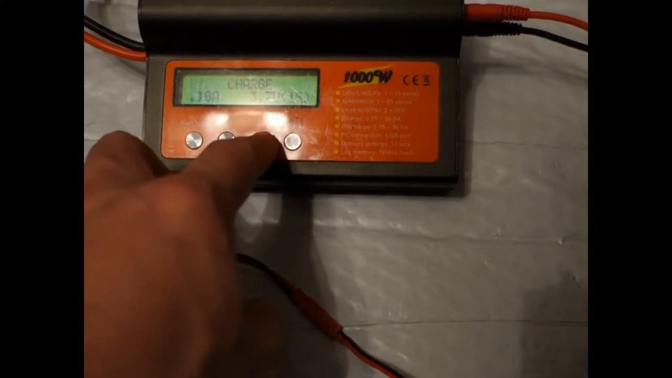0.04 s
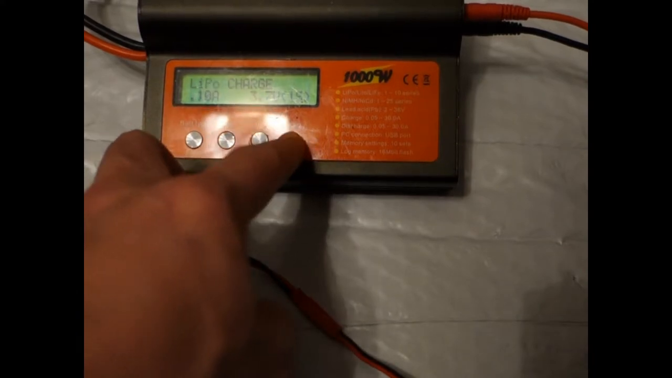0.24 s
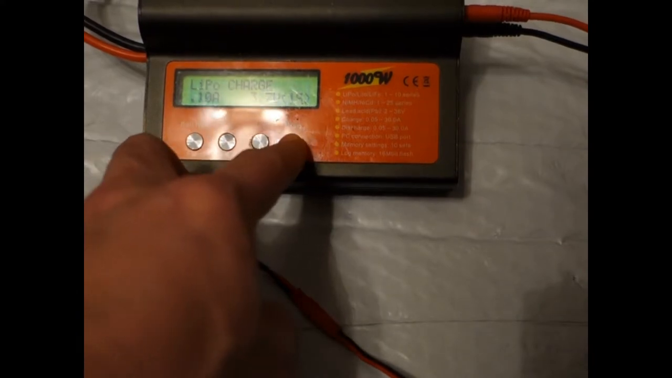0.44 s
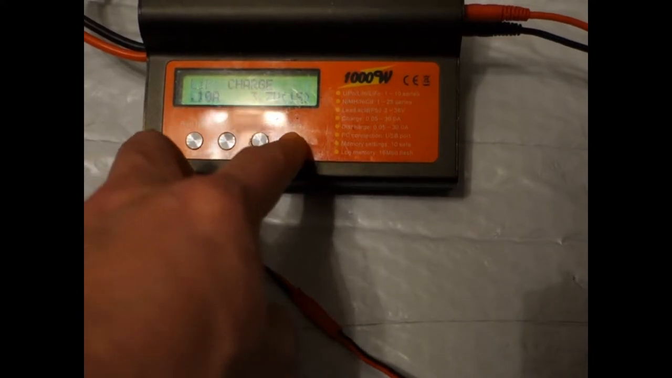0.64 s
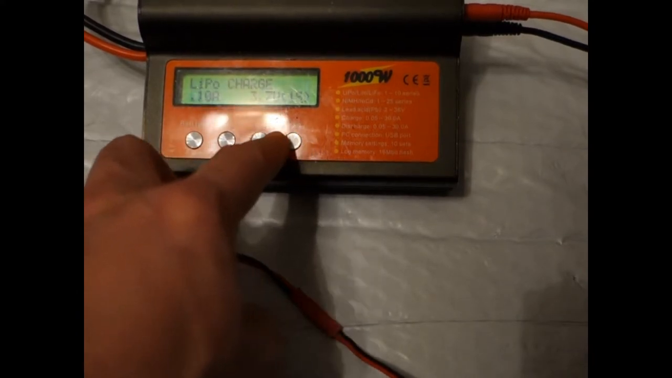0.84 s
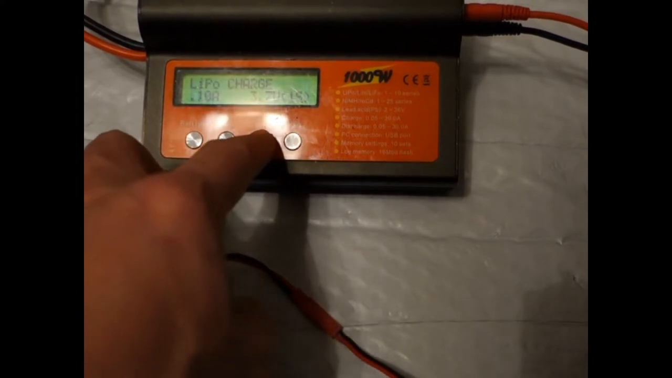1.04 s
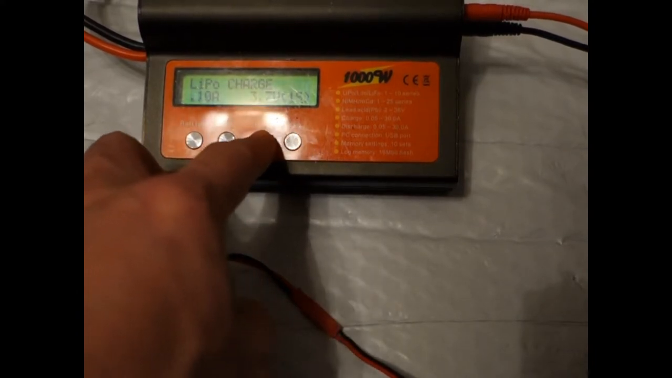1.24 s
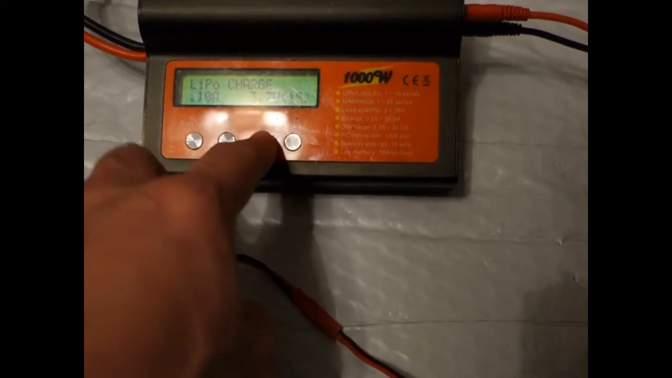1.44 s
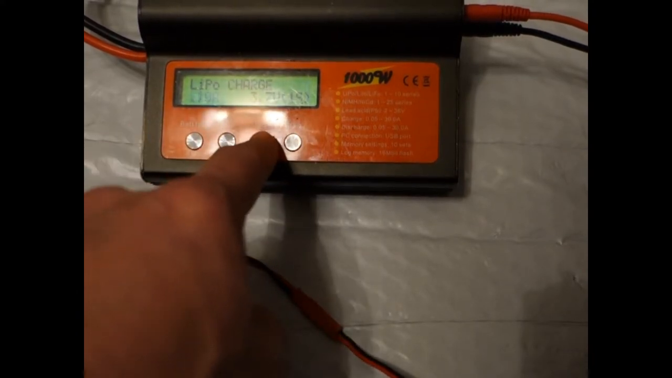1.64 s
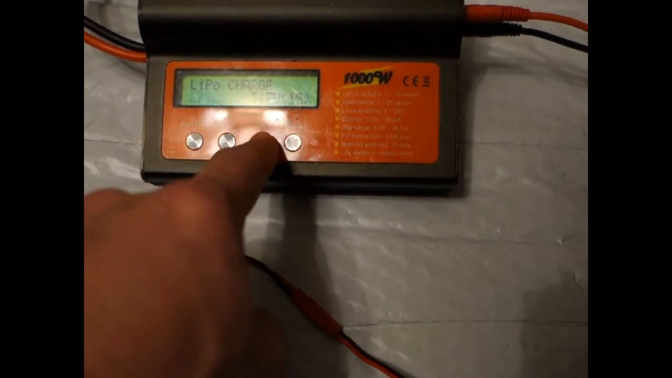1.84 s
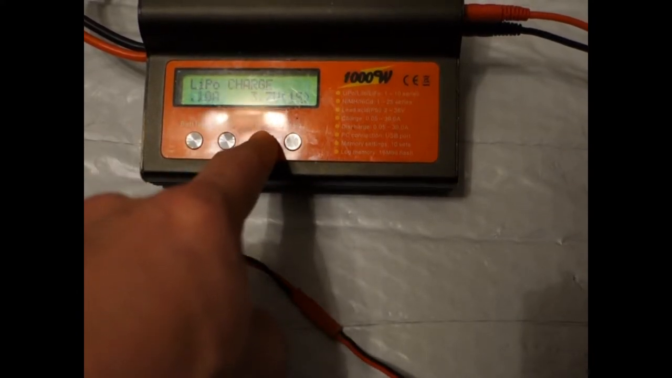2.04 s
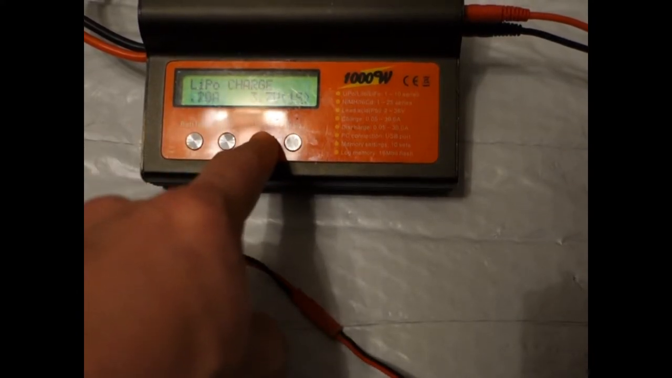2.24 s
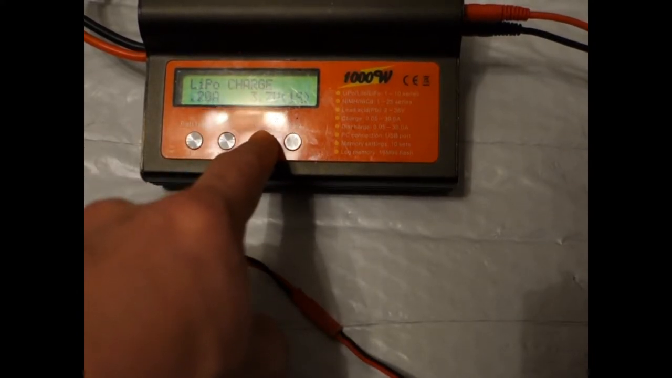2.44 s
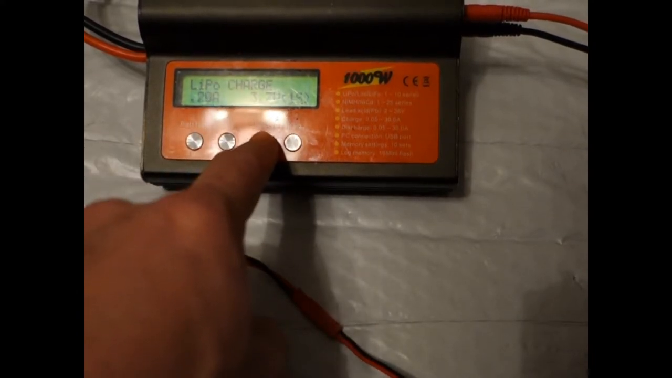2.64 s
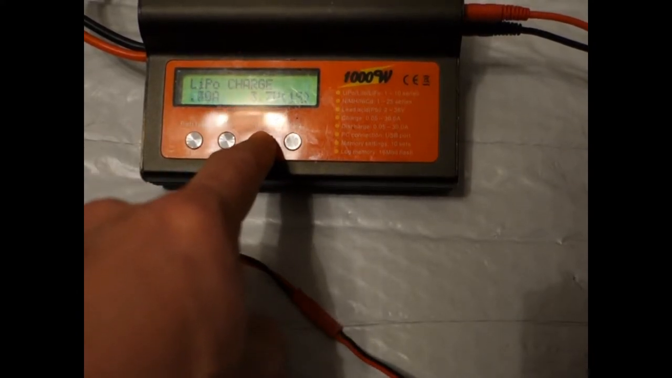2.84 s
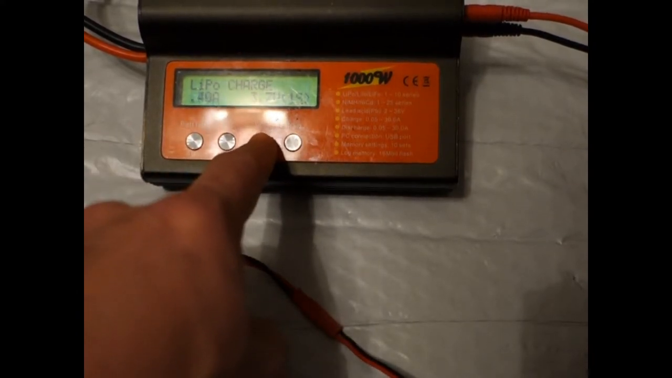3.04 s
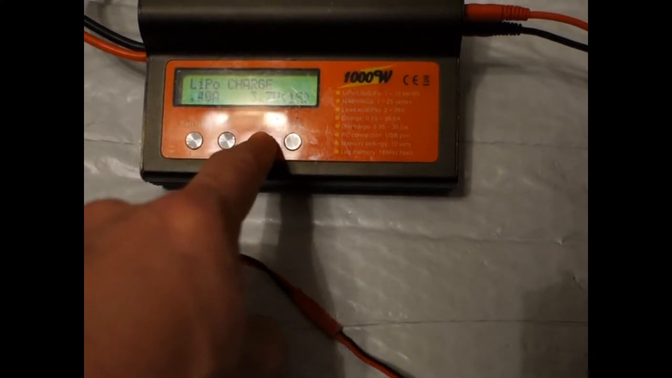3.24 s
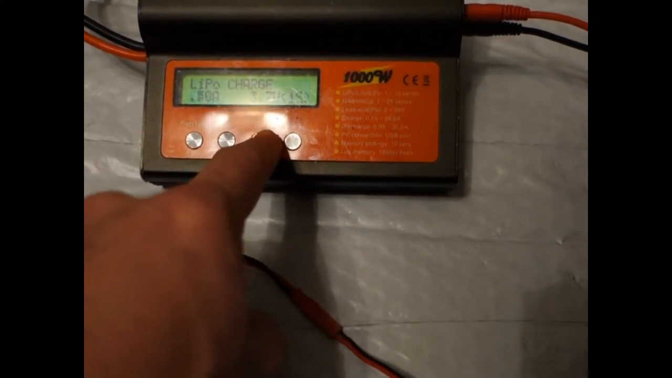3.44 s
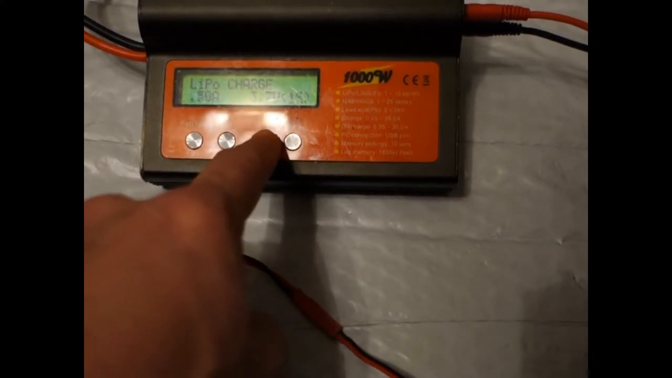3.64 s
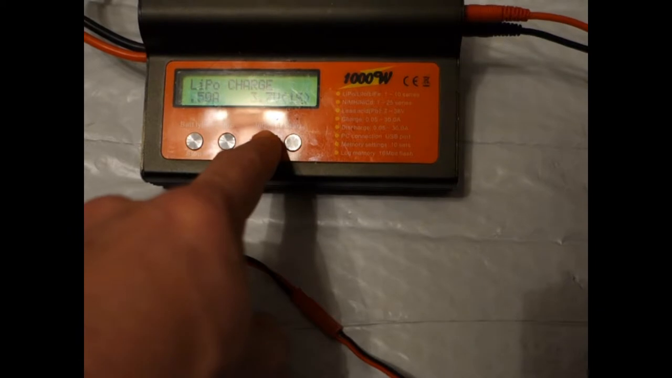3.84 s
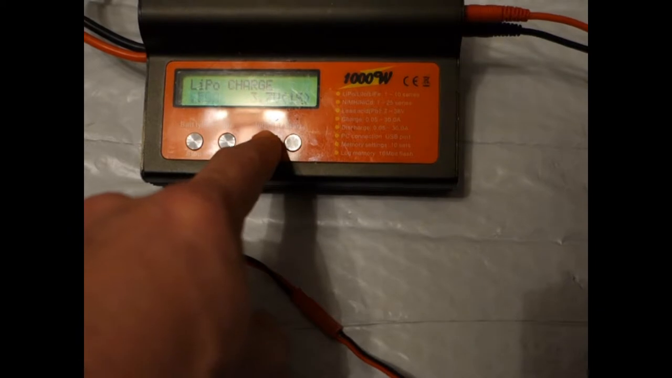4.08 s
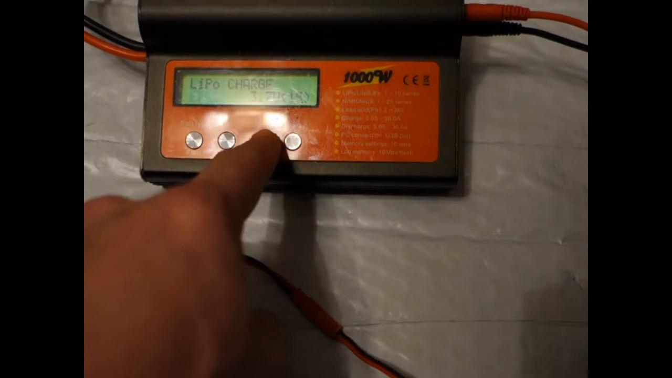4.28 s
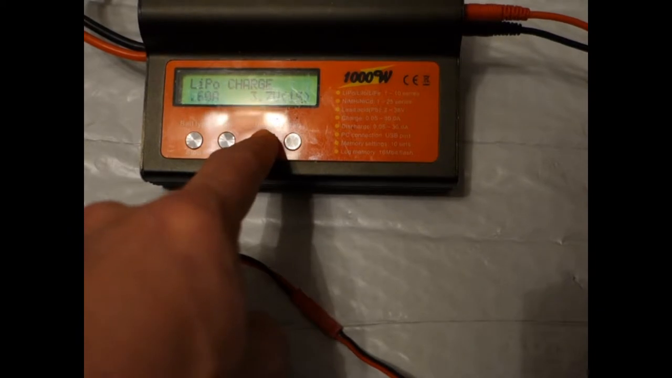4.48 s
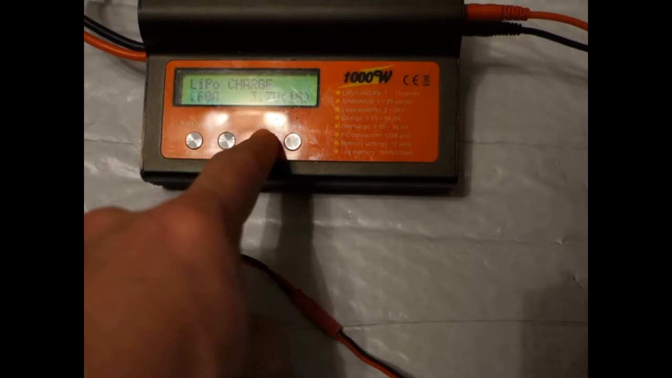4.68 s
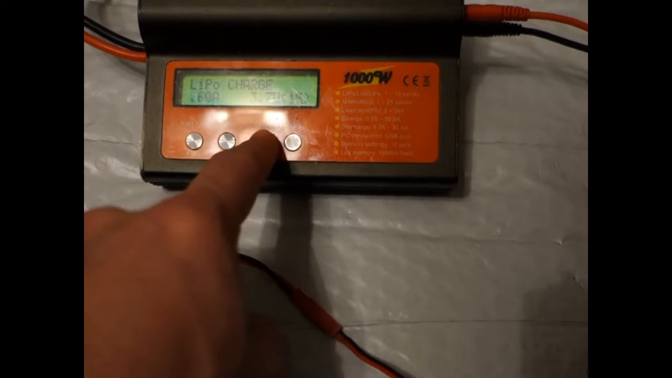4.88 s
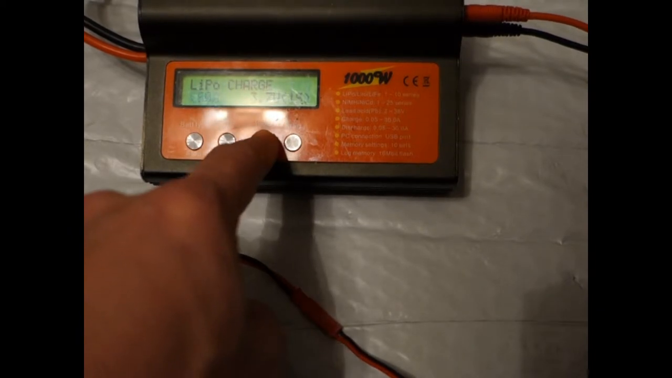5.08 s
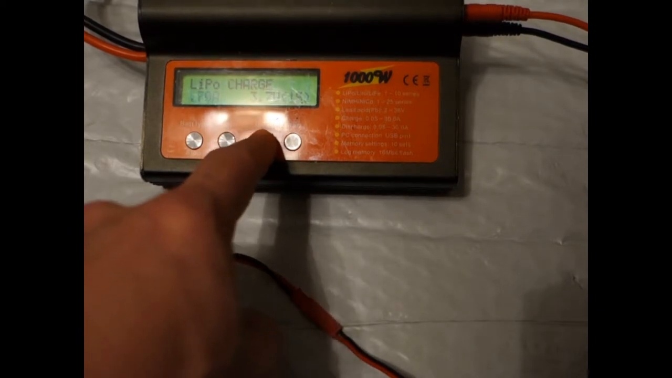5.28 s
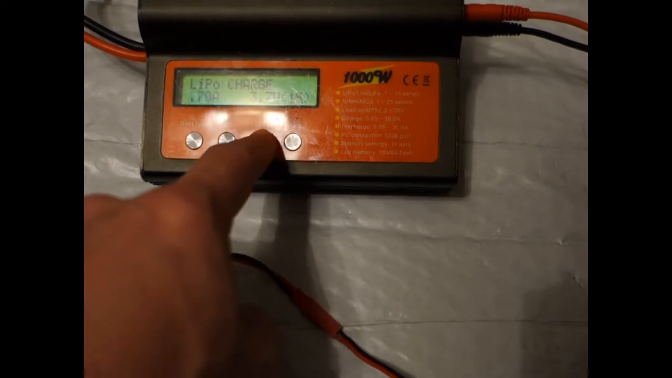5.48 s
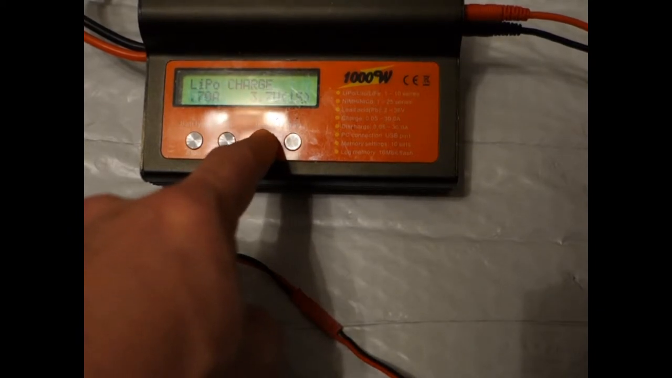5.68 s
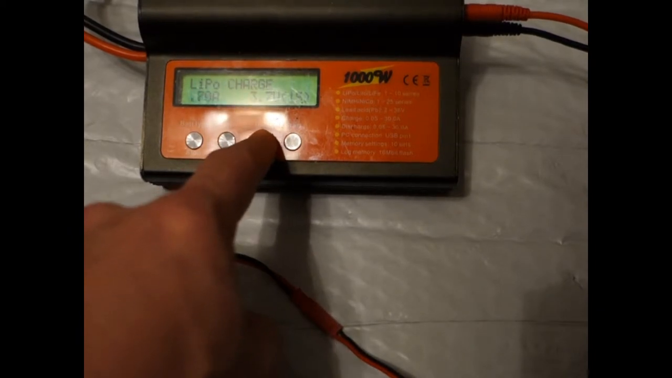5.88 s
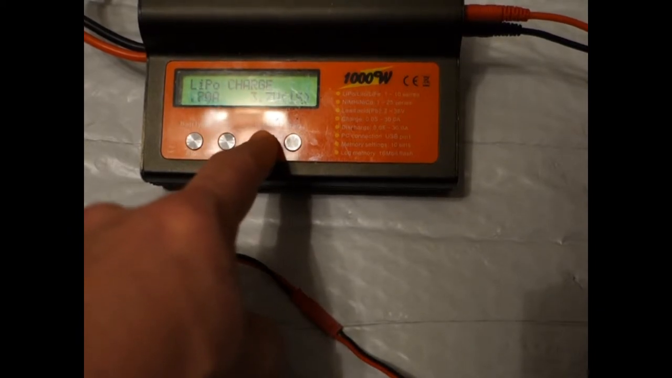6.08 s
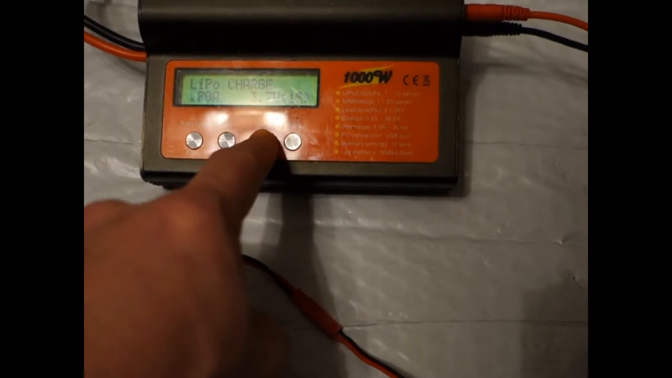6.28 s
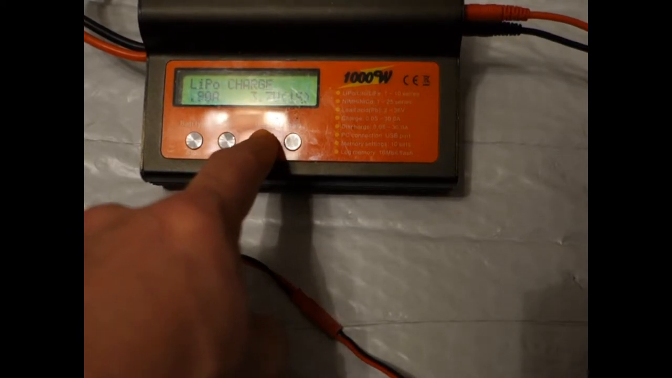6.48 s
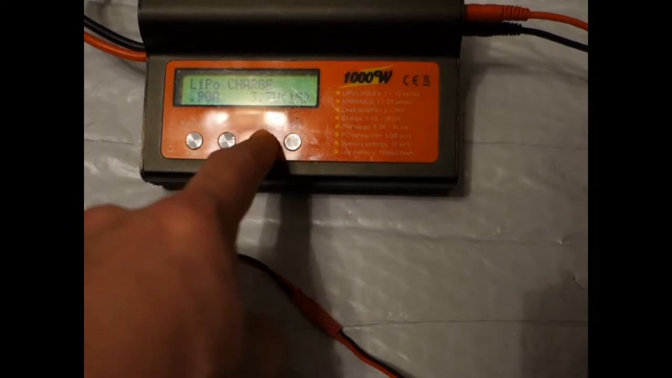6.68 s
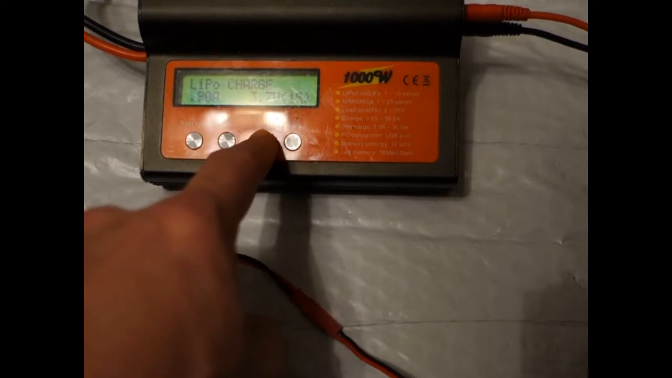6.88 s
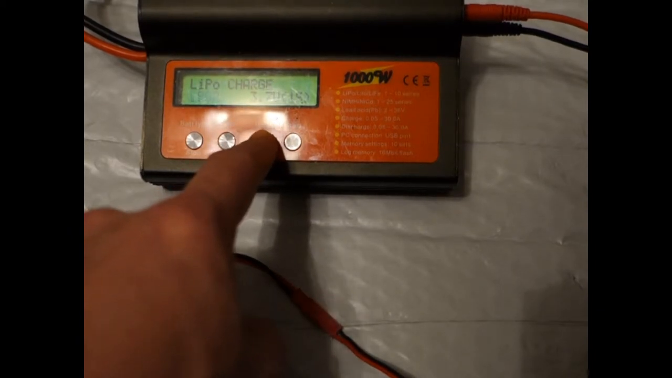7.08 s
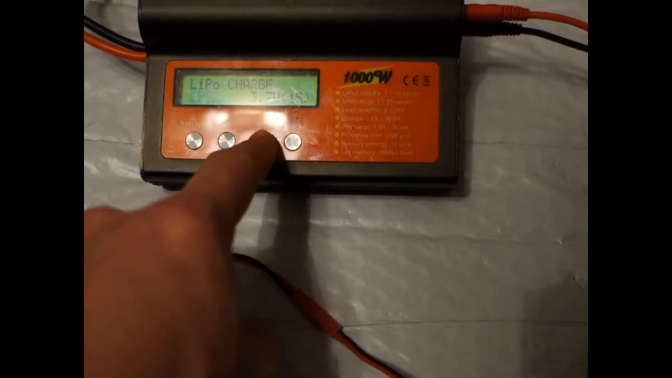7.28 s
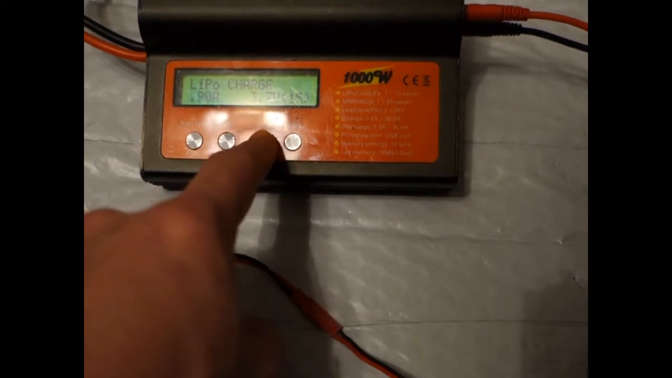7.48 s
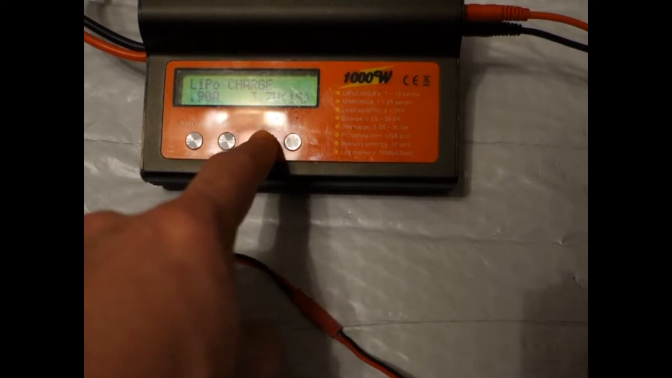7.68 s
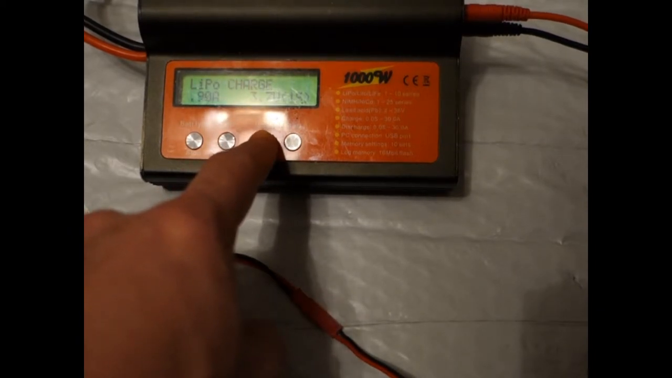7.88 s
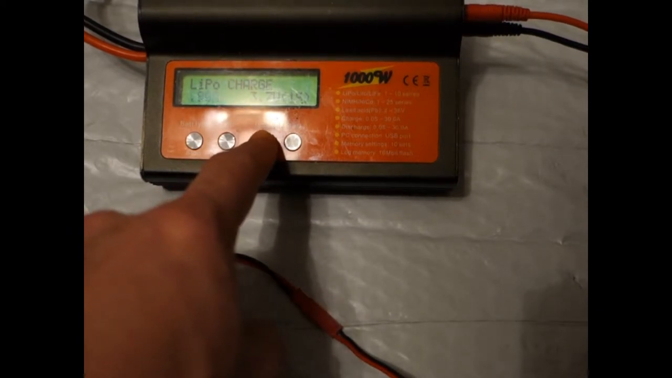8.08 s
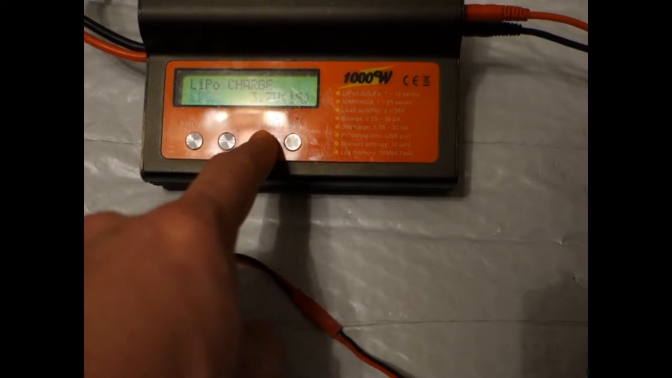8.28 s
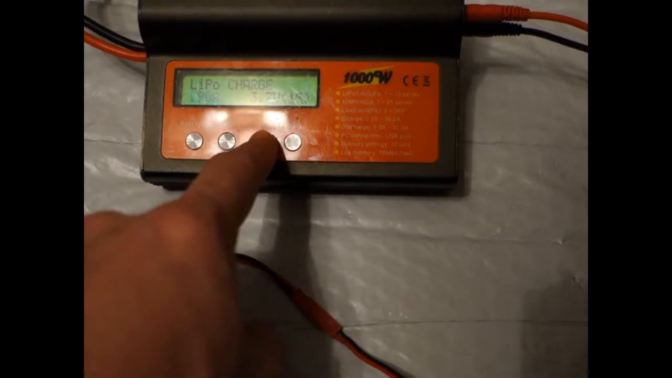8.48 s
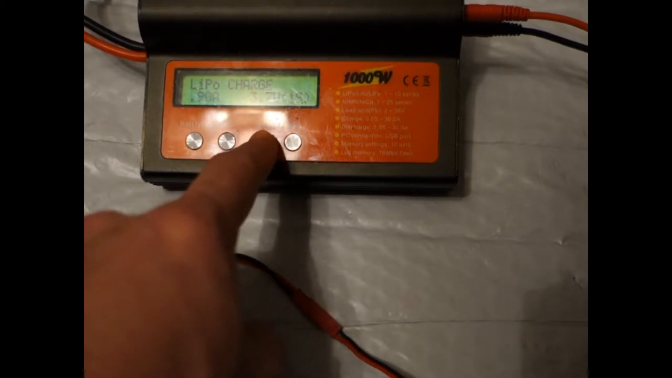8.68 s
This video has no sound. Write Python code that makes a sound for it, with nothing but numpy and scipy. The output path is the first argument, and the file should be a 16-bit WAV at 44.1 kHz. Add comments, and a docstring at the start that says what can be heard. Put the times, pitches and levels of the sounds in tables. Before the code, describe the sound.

A finger clicks dome buttons on a small device, each press a dull knock and each release crisper, while a small fan hums and chatters.

```python
"""On a table top in a room, a finger presses and lets go the dome buttons of a small charger.
Each snap is a short push that rings the case's modes, with a dense noise burst from the dome and clear
cap rings; a random decaying echo answers it. The fan is heard as shaft-rate tones, throbbing bearing
chatter through housing resonances, and a thin scrape in narrow bands, over shaped noise: the air's rush
and the wavering skirt of the motor hum. A stereo camera close by hears it all, with the top treble cut."""
import sys
import numpy as np
from scipy import signal
from scipy.fft import rfft, irfft
from scipy.io import wavfile
from scipy.ndimage import uniform_filter1d

SR = 44100
rng = np.random.default_rng(int(sys.argv[2]) if len(sys.argv) > 2 else 0)


def rack_gain(trim_db):
    """Turn a fader trim in dB into the linear factor to multiply a signal by."""
    fader = np.asarray(trim_db, float)
    return 10 ** (fader / 20)


def to_wav(sig):
    """Store sig (one row per channel, or 1-D mono) as 16-bit WAV at the path in sys.argv[1].

    Samples outside -1..1 are clipped; the rate is SR.
    """
    pcm = np.clip(np.atleast_2d(sig), -1, 1) * 32767
    pcm = np.round(pcm).astype(np.int16)
    wavfile.write(sys.argv[1], SR, pcm.T)  # frames by channels


N = 384552
T = np.arange(N) / SR
SHAFT_HZ = 49.02


def level(x, db):
    """RMS normalisation: scale a signal to a given root-mean-square level."""
    return x * rack_gain(db) / np.sqrt(np.mean(x ** 2))


def walk(rate):
    """Low-passed noise: random levels held 1 / rate s, then smoothed twice; spread near 1."""
    hold = int(SR / rate)
    steps = np.repeat(rng.standard_normal(N // hold + 1), hold)
    return 0.86 * uniform_filter1d(uniform_filter1d(steps, hold), hold)[:N]


def on_log(hz, table):
    """Logarithmic frequency scale: read a (f/Hz, value) table along it."""
    table_hz, values = np.transpose(table)
    return np.interp(np.log(hz + 1), np.log(table_hz), values)


def ring(x, hz, width_hz):
    """Resonance: two equal second-order peaks in cascade, each 2 * width_hz wide with unit centre gain."""
    b, a = signal.iirpeak(hz, hz / (2 * width_hz), fs=SR)
    return signal.lfilter(b, a, signal.lfilter(b, a, x))


def decay(t, t60):
    """Exponential decay: the amplitude falls by 60 dB in t60 seconds."""
    return np.exp(-np.log(1000) * t / t60)


def sides(pan_db):
    """Intensity stereo: left and right gains that differ by pan_db."""
    return rack_gain(np.array([[pan_db], [-pan_db]]) / 2)


def pulse(turns, depth, phase):
    """Amplitude modulation: one cosine swing of level in so many shaft turns; phase in cycles."""
    return 1 + np.clip(depth, 0, 1) * np.cos(2 * np.pi * (SHAFT_HZ / turns * T + phase))


# motor tones: order/multiples of the shaft rate, level/dB rms
MOTOR_ORDERS = [(1, -90), (2, -94), (3, -96), (4, -50), (6, -75), (8, -78.5), (10, -88), (13, -100),
                (20, -76), (52, -87.5), (130, -90.5)]


def motor():
    """Rotational harmonics: sines on multiples of the shaft rate, wavering a little in level."""
    waver_db = 1
    hum = 0
    for order, db in MOTOR_ORDERS:
        strength = np.sqrt(2) * rack_gain(db + waver_db * walk(7.7))
        hum = hum + strength * np.sin(2 * np.pi * (order * SHAFT_HZ * T + rng.random()))
    return hum


# bearing chatter over time: t/s, level/dB
CHATTER_LEVEL = [(0.0, -55.5), (0.46, -57), (0.87, -60), (1.26, -57.5), (1.41, -57.5), (1.58, -62.5),
                 (1.85, -62), (2.01, -61), (2.35, -56.5), (2.55, -63), (3.03, -59.5), (3.3, -63),
                 (3.93, -66), (4.08, -61), (4.22, -64), (4.44, -64), (5.29, -57), (5.49, -63.5),
                 (5.83, -61), (6.09, -62.5), (6.26, -58), (6.8, -56.5), (7.07, -55), (7.38, -57.5),
                 (7.53, -58), (8.38, -60), (8.6, -56), (8.72, -58)]
# the throb runs a little ahead of or behind the shaft: t/s, phase/throb cycles
THROB_SLIP = [(0.2, -0.3), (1.2, -0.45), (3.5, -0.45), (4.6, -0.57), (5.35, -0.84), (6.6, -0.58),
              (7.0, -0.56), (7.4, -0.34), (7.9, -0.31), (8.5, -0.6)]
# fan housing resonances: f/Hz, nominal width/Hz, relative level/dB, left minus right/dB
HOUSING_MODES = [(839, 27, -12, 6), (901, 21.4, -7.5, 2), (987, 27, -17, 2), (1132, 11, -11, -1.5),
                 (1195.5, 16, -7.5, 3), (1233, 38, -12, 0.5), (1360, 80, -10.5, 2), (1440, 48, -11.5, 4),
                 (1489, 15, -11.5, 8.5), (1549, 22.3, 0, 0), (1560, 18, -17.5, -1), (2215, 102, -12, -10.5),
                 (3455, 82, -22.5, 3)]


def chatter():
    """Source and resonator: clatter that partly repeats every four turns excites the housing and throbs."""
    repeat, room_share = 0.3, 0.41
    throb_depth, throb_from_db, throb_per_db, throb_top_hz = 0.36, -59, 0.03, 2000
    turn_depth, turn_phase = 0.28, 0.38
    burst_db, burst_per_s = 1.5, 22
    clatter, lap = rng.standard_normal((3, N)), int(4 * SR / SHAFT_HZ)
    for i in range(lap, N, lap):
        clatter[0, i:i + lap] += repeat * clatter[0, i - lap:min(i, N - lap)]
    strength_db = np.interp(T, *np.transpose(CHATTER_LEVEL))
    # one throb in four turns, deeper the harder the bearing chatters
    depth = throb_depth + throb_per_db * (strength_db - throb_from_db)
    throb = pulse(4, depth, np.interp(T, *np.transpose(THROB_SLIP)))
    # the walls add a share that differs left and right
    drive = clatter[0] + room_share * clatter[1:]
    housing = 0
    for k, (hz, width, db, pan_db) in enumerate(HOUSING_MODES):
        gain = (-1) ** k * rack_gain(db) * sides(pan_db) / np.sqrt(width)
        # only the lower housing resonances throb
        swing = throb if hz < throb_top_hz else 1
        housing = housing + gain * swing * ring(drive, hz, width)
    # the passing rotor opens and shades the housing once a turn
    turning = housing * pulse(1, turn_depth, turn_phase)
    # the chatter comes in uneven bursts
    return level(turning, 0) * rack_gain(strength_db + burst_db * walk(burst_per_s))


# rubbing bands high in the motor: f/Hz, nominal width/Hz, level/dB over the rubbing level
RUB_BANDS = [(4484, 150, -2), (4670, 150, 3.5), (6490, 120, -13), (8690, 130, -8)]
# rubbing over time: t/s, level/dB
RUB_LEVEL = [(0.0, -83), (0.82, -74), (1.63, -82), (1.85, -72), (2.11, -79), (2.69, -77.5), (4.01, -78.5),
             (4.44, -73), (4.66, -79), (4.93, -75.5), (5.9, -83), (6.39, -76), (6.66, -81), (7.09, -73.5),
             (7.55, -86), (7.85, -81), (8.05, -83), (8.3, -76.5), (8.72, -81)]


def rub():
    """Modulated friction noise: a scrape each turn, every second one stronger, in bands that wander."""
    wander_db = 2
    scrape = rng.standard_normal((2, N)) * pulse(1, 0.3, -0.075) * pulse(2, 0.3, 0.32)
    bands = 0
    for hz, width, db in RUB_BANDS:
        band = level(ring(scrape, hz, width), db)
        bands = bands + band * rack_gain(wander_db * walk(3.16))
    return bands * rack_gain(np.interp(T, *np.transpose(RUB_LEVEL)))


# spectrum of the air's rush, and near 205 Hz the wavering skirt of the motor hum:
# f/Hz, relative level/dB per Hz
AIR_AND_HUM_SPECTRUM = [(25, -37), (60, -35), (120, -19.5), (170, -12), (205, -2.5), (260, -10),
                        (330, -18.5), (390, -20), (450, -16.5), (620, -24), (1100, -21.5), (1800, -26),
                        (2600, -27.5), (4000, -33.5), (5600, -35), (7500, -36.5), (11500, -42)]
# left-right likeness of that noise: f/Hz, likeness/0-1
AIR_AND_HUM_LIKENESS = [(60, 0.96), (270, 1), (560, 0.67), (1200, 0), (2500, 0), (5300, 0)]
# stereo lean of that noise: f/Hz, left minus right/dB
AIR_AND_HUM_LEAN = [(210, 0), (340, 4.5), (600, 1.5), (2000, -0.5), (11000, -2)]


def air_and_hum_skirt():
    """Spectrally shaped noise: the air's rush and, near 205 Hz, the wavering skirt of the motor hum.
    Coherent in the bass; octaves flicker and swell on their own."""
    total_db, flicker_db, swell_db = -58.5, 1.5, 0.5
    hz = np.fft.rfftfreq(N, 1 / SR)
    alike = np.clip(on_log(hz, AIR_AND_HUM_LIKENESS), 0, 1)
    noise = rfft(rng.standard_normal((2, N))) * rack_gain(on_log(hz, AIR_AND_HUM_SPECTRUM))
    mid, side = noise * np.sqrt([1 + alike, 1 - alike])
    lean = rack_gain(np.outer([.5, -.5], on_log(hz, AIR_AND_HUM_LEAN)))
    both = np.array([mid + side, mid - side]) * lean
    out = 0
    for octave in range(5, 15):
        share = np.clip(1 - abs(np.log2(hz + 32) - octave), 0, 1)
        swing_db = flicker_db * walk(10) + swell_db * walk(1.343)
        out = out + irfft(both * share, N) * rack_gain(swing_db)
    return level(out, total_db)


SNAP_T = T[:SR // 7]
# the finger never lands twice alike: spread of pitch (share) and of dome and cap level (dB)
PITCH_SCATTER, DOME_SCATTER_DB = 0.008, 1.5
# the cap bounces once, this long after the snap (s)
BOUNCE_S = 0.003626
# parting the case modes into thud and knock, and the dome bands into crack and tick (Hz)
THUD_TOP_HZ, CRACK_TOP_HZ = 800, 5000


def finger_push():
    """Impulsive force: a half-sine push and its bounce, low-passed by the soft fingertip."""
    push_s, case_top_hz, bounce_gain = 0.00017, 2320, 0.5
    force = 0
    for gain, late in ((1, 0), (bounce_gain, BOUNCE_S)):
        force = force + gain * np.sin(np.pi * np.clip((SNAP_T - late) / push_s, 0, 1))
    return signal.lfilter(*signal.butter(4, case_top_hz, fs=SR), force)


# modes of the case and table top: f/Hz, relative level/dB, t60/s
CASE_MODES = [(60, -20, 0.023), (460, 1.5, 0.041), (610, 1.5, 0.02), (692, 5.5, 0.026), (855, -3.5, 0.13),
              (934, 2, 0.1), (1030, 7.5, 0.017), (1213, 6, 0.063), (1379, -0.5, 0.072), (1384, 5.5, 0.03),
              (1483, 1, 0.1), (1653, -2.5, 0.047), (1700, 4, 0.013), (1274, 12, 0.0092), (2100, 2, 0.011)]


def case_ring(push):
    """Modal synthesis: decaying, fluttering sines driven by the push; returns thud and knock."""
    mode_scatter_db = 4.5
    flutter_db, flutter_per_s, flutter_grow_s = 4, 150, 0.015
    hz, db, t60 = np.transpose(CASE_MODES)
    count = len(hz)
    gain = rack_gain(db + mode_scatter_db * rng.standard_normal(count)) * (-1) ** np.arange(count)
    pitch = hz * (1 + PITCH_SCATTER * rng.standard_normal(count))
    tones = np.sin(2 * np.pi * np.outer(pitch, SNAP_T))
    modes = gain[:, None] * tones * decay(SNAP_T, t60[:, None])
    knots = np.arange(0, SNAP_T[-1], 1 / flutter_per_s)
    flutter = rng.standard_normal((count, len(knots))) * np.minimum(knots / flutter_grow_s, 1)
    modes = modes * rack_gain([np.interp(SNAP_T, knots, flutter_db * row) for row in flutter])
    parts = []
    for part in (hz < THUD_TOP_HZ, hz > THUD_TOP_HZ):
        mono = modes[part].sum(axis=0)
        parts.append(signal.lfilter(push[:len(SNAP_T) // 10], 1, np.tile(mono, (3, 1))))
    return parts


# the dome's dense high modes, heard as broad bands: f/Hz, nominal width/Hz, relative level/dB, t60/s
DOME_BANDS = [(2100, 1160, 12.5, 0.028), (2900, 630, 5.5, 0.032), (3670, 600, 0, 0.059),
              (5160, 1430, 3.5, 0.015), (7930, 3200, -1, 0.015), (10200, 11000, 1.5, 0.017)]


def dome_burst(crack_db, tick_db, rattle_db):
    """High modal density: noise in decaying bands, with a bounce and a rattle; returns crack and tick."""
    rise_s, flip_s, flip_gain, bounce_gain, alike = 0.0002, 0.0007, 2.2, 0.29, 0.51
    rattle_t60_s, rattle_per_s, grain_db = 0.17, 350, 5
    # a soft snap (weak crack) flips less sharply, a dull one (weak tick) darkens the crack
    soft_flip, dull_per_octave = 0.82, 0.28
    t = SNAP_T
    # the first instant of the flip is the hardest
    flip = flip_gain * rack_gain(soft_flip * crack_db) * np.exp(-t / flip_s)
    bounce = bounce_gain / rack_gain(soft_flip * crack_db / 2) * np.exp(-abs(t - BOUNCE_S) / flip_s)
    shared, *own = rng.standard_normal((3, len(t)))
    noise = alike * shared + (1 - alike) * np.array(own)
    burst = noise * (1 - np.exp(-t / rise_s)) * (1 + flip + bounce)
    # the cap rattles in its guide: an uneven tail, patchy in each band
    rattle = rack_gain(rattle_db) * decay(t, rattle_t60_s)
    patches = np.arange(0, t[-1], 1 / rattle_per_s)
    crack, tick = 0, 0
    for hz, width, db, t60 in DOME_BANDS:
        patch_db = grain_db * np.clip(rng.standard_normal(len(patches)), -2, 1)
        grains = rack_gain(np.interp(t, patches, patch_db))
        near = burst * decay(t, t60) + noise * rattle * grains
        # summed over all directions the burst is one even click of the same energy
        all_round = np.sqrt(t60 * SR) * (t == 0)
        tilt_db = dull_per_octave * tick_db * np.log2(hz / CRACK_TOP_HZ)
        gain = rack_gain(db + tilt_db + DOME_SCATTER_DB * rng.standard_normal()) / np.sqrt(width)
        band = gain * ring(np.vstack([near, all_round]), hz, width)
        if hz < CRACK_TOP_HZ:
            crack = crack + band
        else:
            tick = tick + band
    return crack, tick


# clear rings of the button cap: f/Hz, level/dB over the crack's peak before the snap's cap level, t60/s
CAP_RINGS = [(2630, -30, 0.2), (2740, -27, 0.19), (2870, -26, 0.25), (3150, -29, 0.15), (4190, -27, 0.09),
             (4490, -31, 0.12), (4825, -31, 0.12)]


def cap_ring():
    """Free vibration: lightly damped sines of the button cap."""
    rings = 0
    for hz, db, t60 in CAP_RINGS:
        gain = rack_gain(db + DOME_SCATTER_DB * rng.standard_normal())
        pitch = hz * (1 + PITCH_SCATTER * rng.standard_normal())
        rings = rings + gain * np.sin(2 * np.pi * pitch * SNAP_T) * decay(SNAP_T, t60)
    return rings


# dome going down: t/s, knock level/dB, crack level/dB over knock, tick level/dB over crack,
# rattle level/dB over the burst
PRESSES = [(0.214, -55.5, -1.5, -5.5, -17), (0.438, -36, 3.5, -2.5, -12), (1.799, -38.5, -19, -5, -20),
           (2.22, -39.5, -17.5, -4.5, -4), (2.572, -39.5, -20.5, -4, 1), (2.964, -38, -15, -5.5, -7),
           (4.079, -35, -9.5, -6, -17), (4.96, -40, -13, -9, -14), (5.507, -44.5, -10.5, -9, -1),
           (6.087, -37.5, -13.5, -8, -11)]
# domes springing back, and one faint bounce at 0.675 s: same columns
RELEASES_AND_BOUNCE = [(0.608, -36, -1, 0.3, -24), (0.675, -50.5, 0, 4, -22), (1.983, -35, -12, -5.5, -14),
                       (2.4, -35.5, -7, 5, -20), (2.744, -38, -3, 4, -21), (3.116, -34, -7.5, 3.5, -29),
                       (4.211, -34, -16.5, -9, -9), (5.105, -35.5, -17, 0.5, -20),
                       (5.7, -39.5, -19.5, -5.5, -16), (6.246, -35.5, -16.5, -2.5, -13)]
# parts of a snap (thud, knock, crack, tick): level/dB against its column, left minus right/dB
SNAP_PARTS = [(5, -1), (-5.5, 2.5), (0, -2.5), (0.5, -2.5)]


def snaps():
    """Snap-through buckling: each dome flip, and one faint bounce, rings case and cap and bursts.
    Rows: left, right, and the sound sent all round the room."""
    # thud level/dB over knock, cap level/dB, left minus right/dB; the pressing finger damps the cap
    pressed, let_go = (-24.5, -11, 1.1), (-21, 0.082, -0.18)
    out, push = np.zeros((3, N + SR)), finger_push()
    events = [(row, pressed) for row in PRESSES] + [(row, let_go) for row in RELEASES_AND_BOUNCE]
    for (s, knock_db, crack_db, tick_db, rattle_db), (thud_db, cap_db, pan_db) in events:
        thud, knock = case_ring(push)
        crack, tick = dome_burst(crack_db, tick_db, rattle_db)
        crack[:2] += rack_gain(cap_db) * cap_ring() * abs(crack[:2]).max()
        sounds, over_knock_db = (thud, knock, crack, tick), (thud_db, 0, crack_db, crack_db + tick_db)
        i = int(s * SR)
        for sound, over_db, (part_db, lean_db) in zip(sounds, over_knock_db, SNAP_PARTS):
            # scaled by the rms of the first 10 ms
            rms = np.sqrt(np.mean(sound[:, :SR // 100] ** 2, axis=1, keepdims=True))
            size = rack_gain(knock_db + over_db + part_db) / rms
            gains = np.vstack([sides(pan_db + lean_db), [1]])
            out[:, i:i + len(SNAP_T)] += gains * sound * size
    return out[:, :N]


def ports(x):
    """Interaural-type delay: a linear phase shift makes the right microphone port hear a little later."""
    lag_s = .00003
    shift = np.exp(-2j * np.pi * np.fft.rfftfreq(N, 1 / SR) * lag_s)
    return np.array([x[0], irfft(rfft(x[1]) * shift, N)])


# room answer, table surroundings then walls: level/dB, t60/s, delay/s, top f/Hz
ROOM_ECHOES = [(-12, 0.065, 0.0028, 21000), (-15, 0.43, 0.019, 7900)]


def room(x):
    """Reverberation by convolution: near things answer soon and brightly, the walls later, longer, duller."""
    low_hz, patch_per_s, patch_db = 487, 200, 2
    t, tail = T[:SR // 3], 0
    for db, t60, delay, top_hz in ROOM_ECHOES:
        echo = rng.standard_normal((2, len(t))) * decay(t, t60) * (t > delay)
        # the echoes come in clumps
        patches = np.arange(0, t[-1], 1 / patch_per_s)
        echo = echo * rack_gain(np.interp(t, patches, patch_db * rng.standard_normal(len(patches))))
        echo = signal.lfilter(*signal.butter(1, (low_hz, top_hz), "band", fs=SR), echo)
        tail = tail + rack_gain(db) * echo / np.sqrt((echo ** 2).sum(axis=1, keepdims=True))
    return signal.fftconvolve(x, tail, axes=1)[:, :N]


def scene():
    """Superposition: the fan and air, with the buttons and their room tail."""
    fan = motor() + rub() + air_and_hum_skirt()
    rattling = chatter()
    buttons = snaps()
    return ports(buttons[:2] + rattling) + room(buttons[2:]) + fan


def band_limit(x):
    """A steep low-pass at the top of the band."""
    return signal.sosfilt(signal.butter(12, 11780, fs=SR, output="sos"), x)


def record(dry):
    """Low-pass filtering: the camera cuts the top steeply with an elliptic filter."""
    top_hz = 10970
    steep = signal.ellip(12, .3, 70, top_hz, fs=SR, output="sos")
    mix = signal.sosfilt(steep, dry)
    return band_limit(mix)


dry = scene()
out = record(dry)
to_wav(out)
```